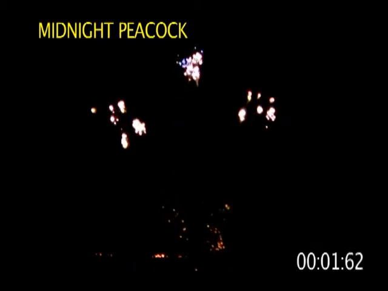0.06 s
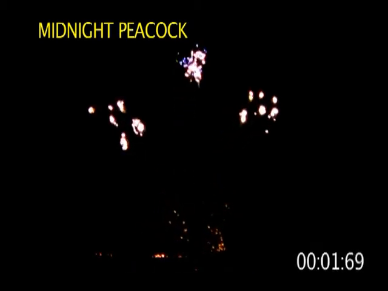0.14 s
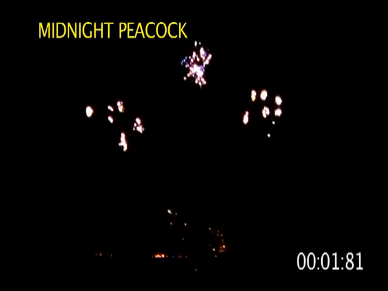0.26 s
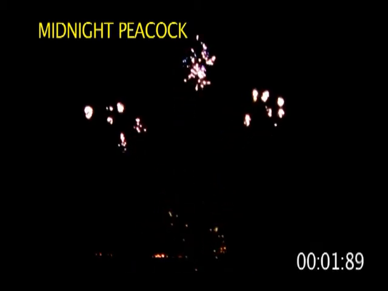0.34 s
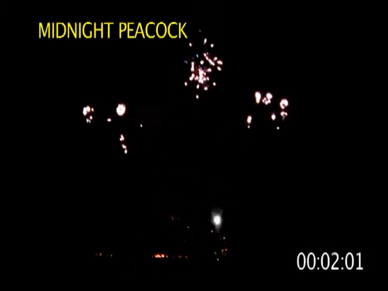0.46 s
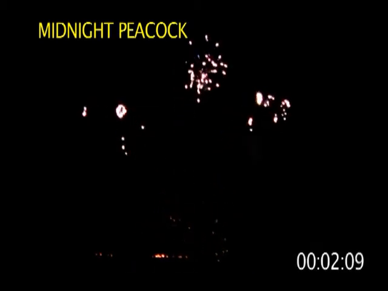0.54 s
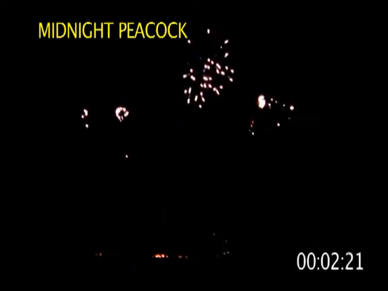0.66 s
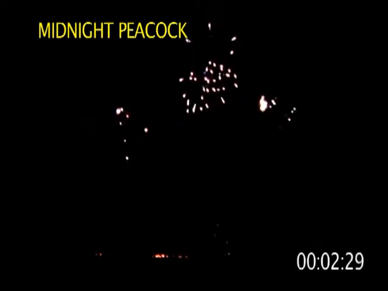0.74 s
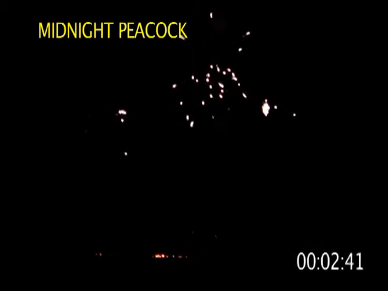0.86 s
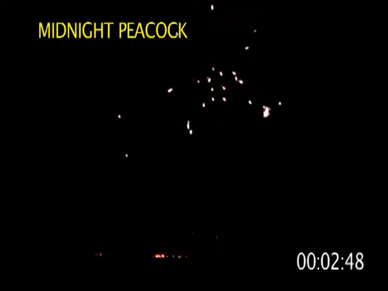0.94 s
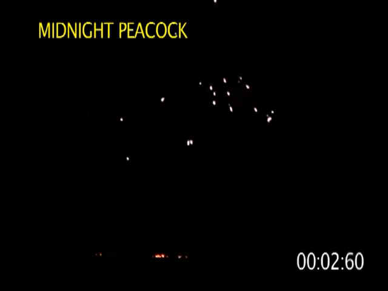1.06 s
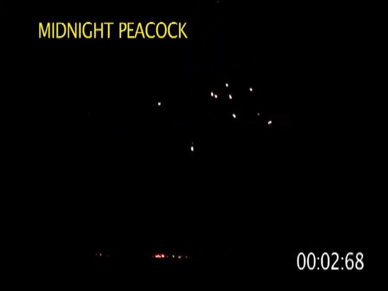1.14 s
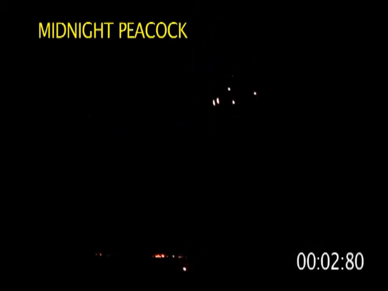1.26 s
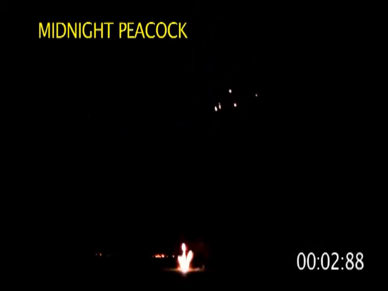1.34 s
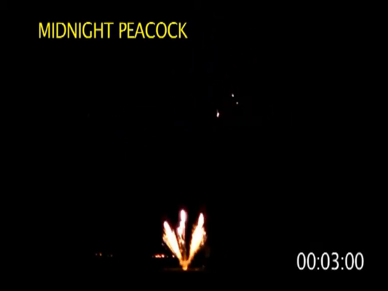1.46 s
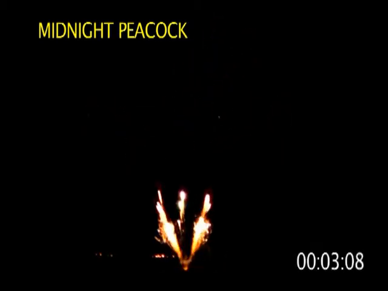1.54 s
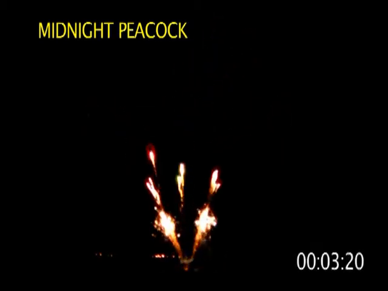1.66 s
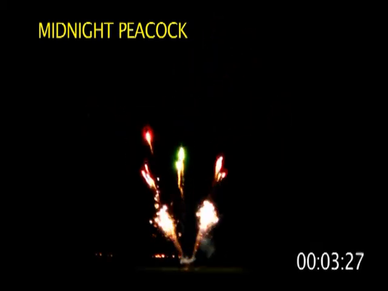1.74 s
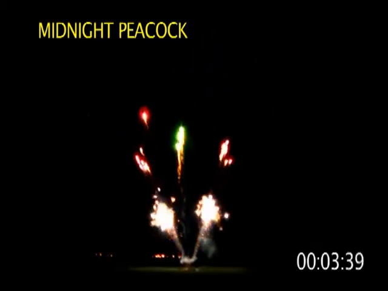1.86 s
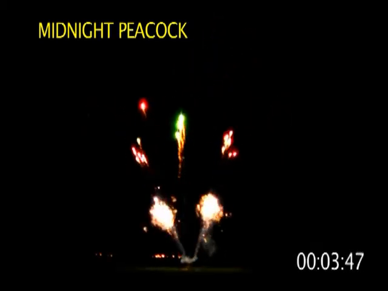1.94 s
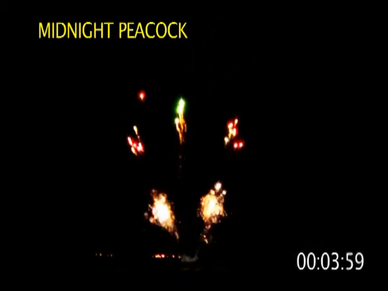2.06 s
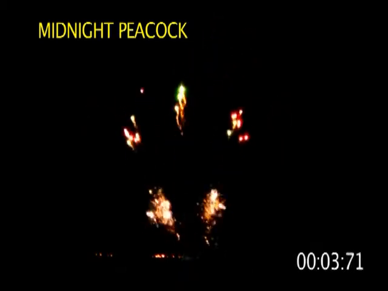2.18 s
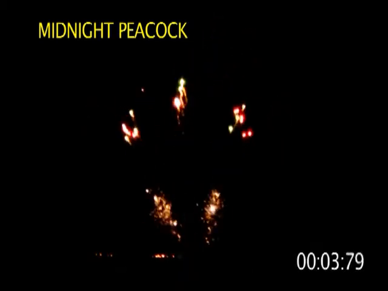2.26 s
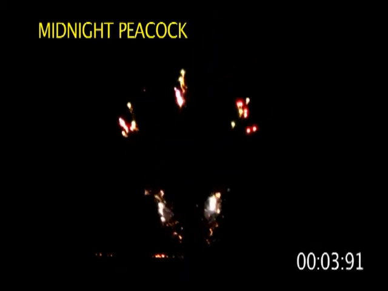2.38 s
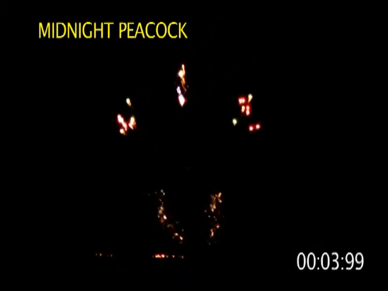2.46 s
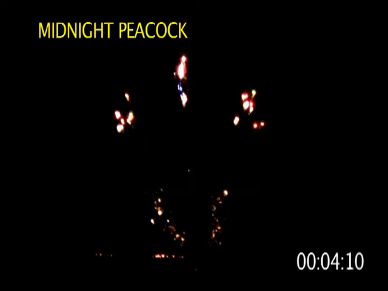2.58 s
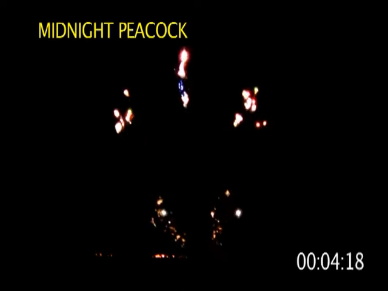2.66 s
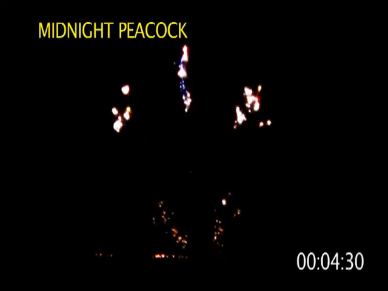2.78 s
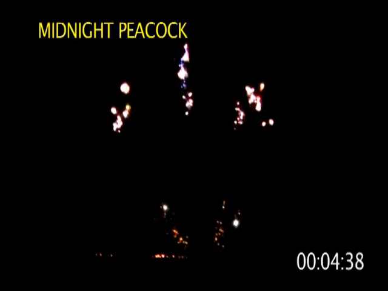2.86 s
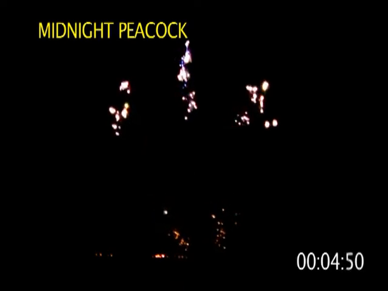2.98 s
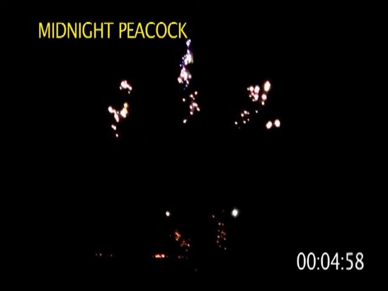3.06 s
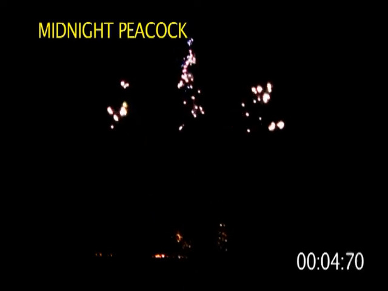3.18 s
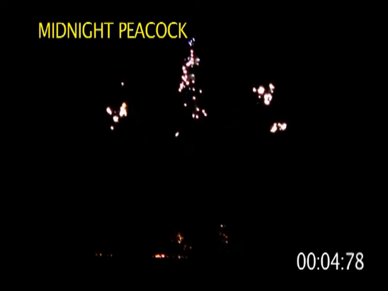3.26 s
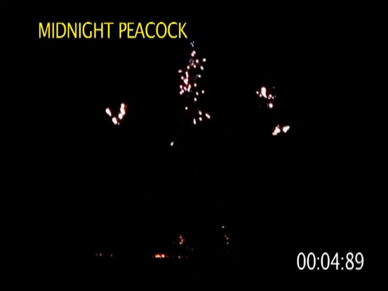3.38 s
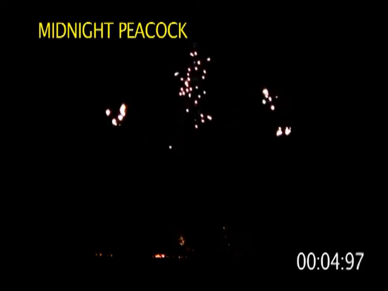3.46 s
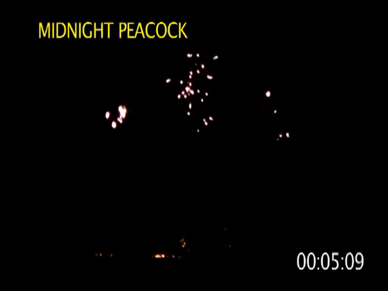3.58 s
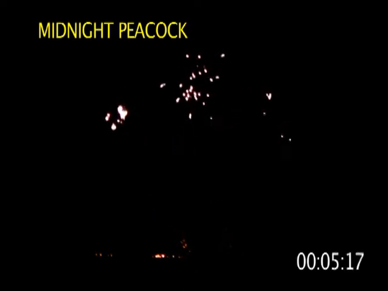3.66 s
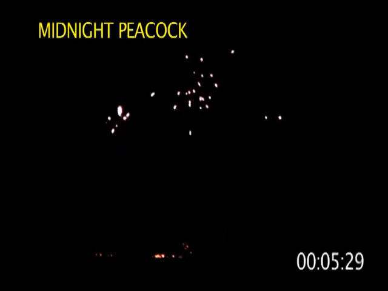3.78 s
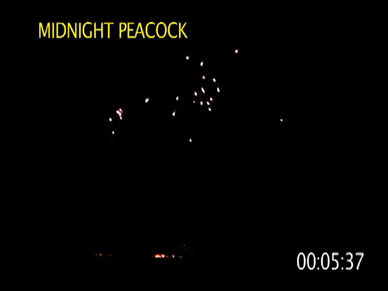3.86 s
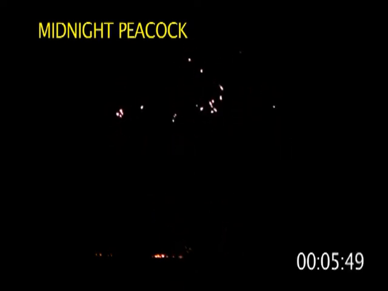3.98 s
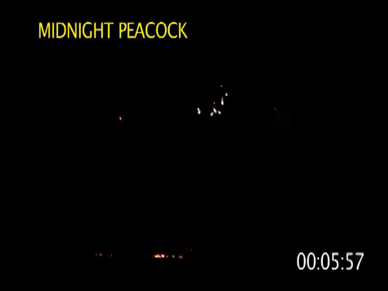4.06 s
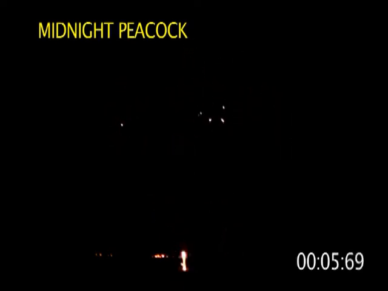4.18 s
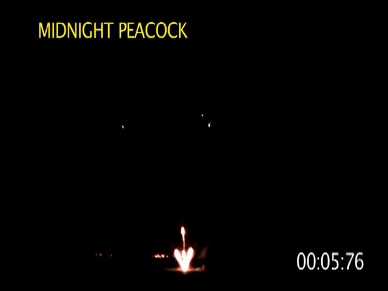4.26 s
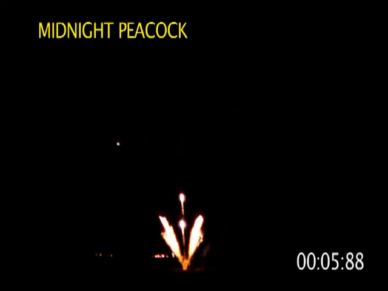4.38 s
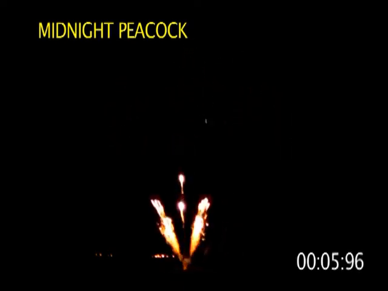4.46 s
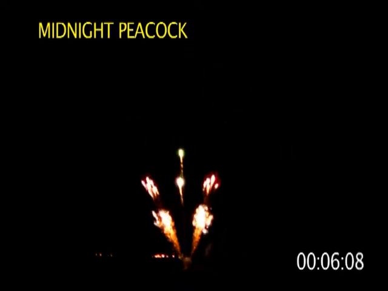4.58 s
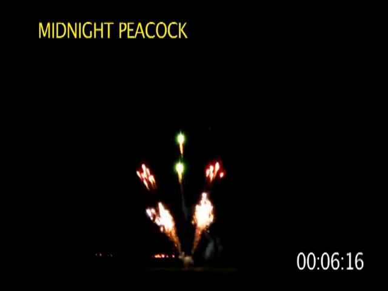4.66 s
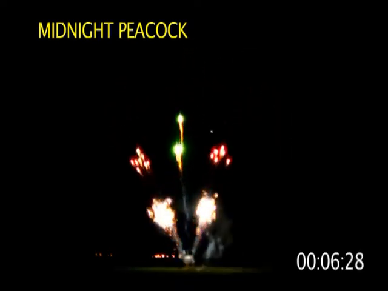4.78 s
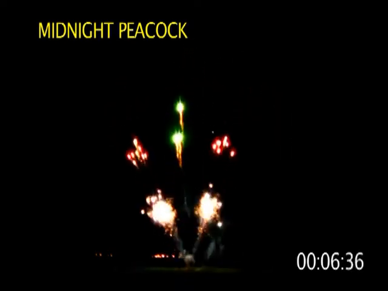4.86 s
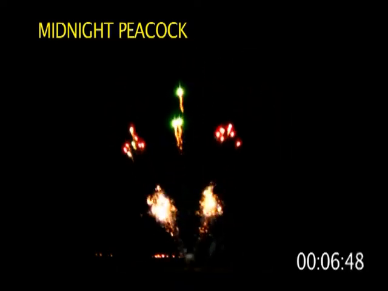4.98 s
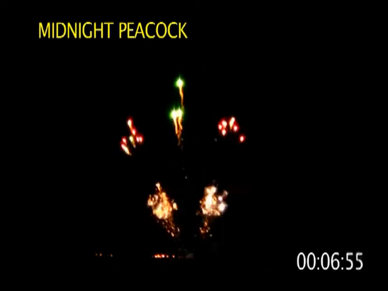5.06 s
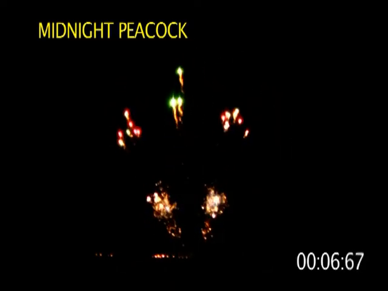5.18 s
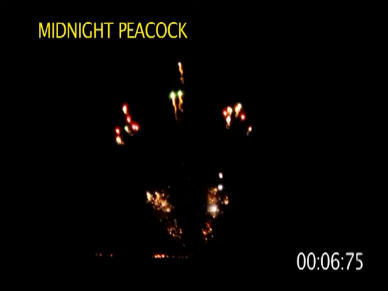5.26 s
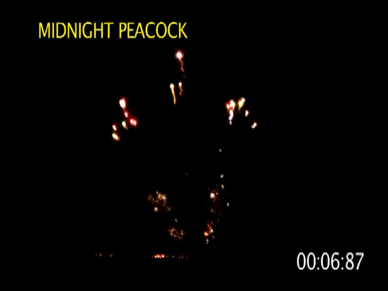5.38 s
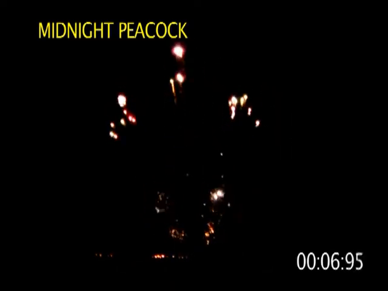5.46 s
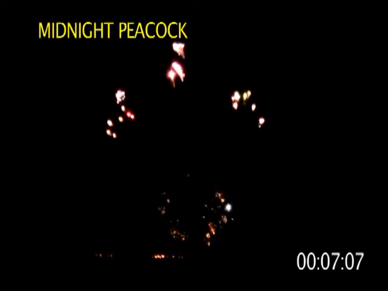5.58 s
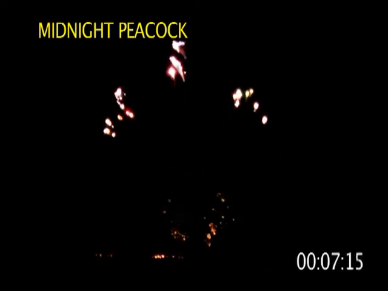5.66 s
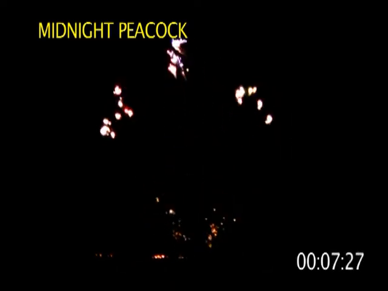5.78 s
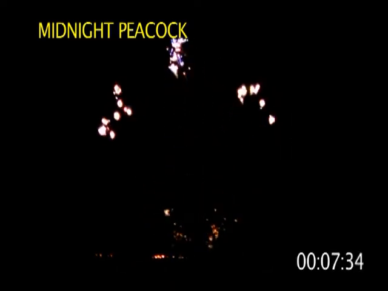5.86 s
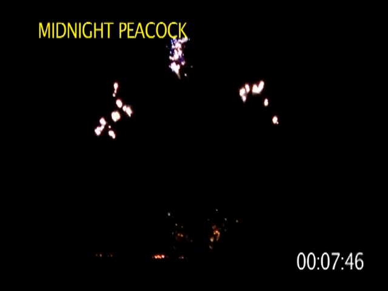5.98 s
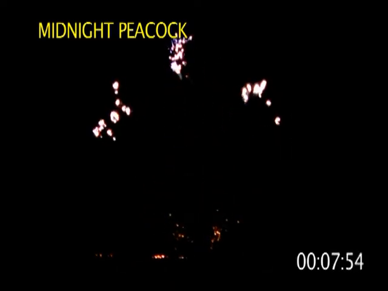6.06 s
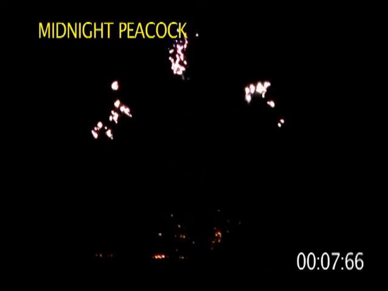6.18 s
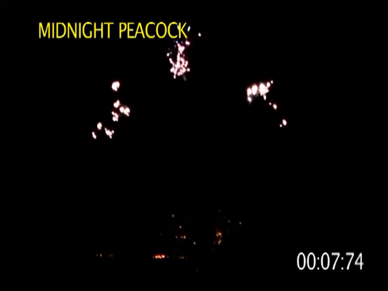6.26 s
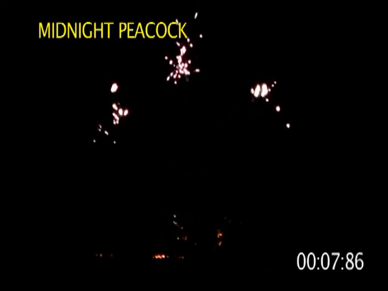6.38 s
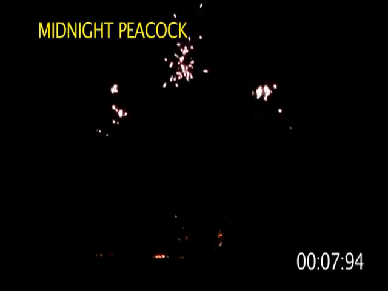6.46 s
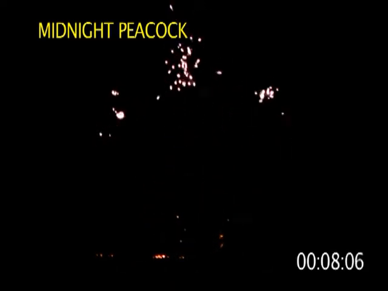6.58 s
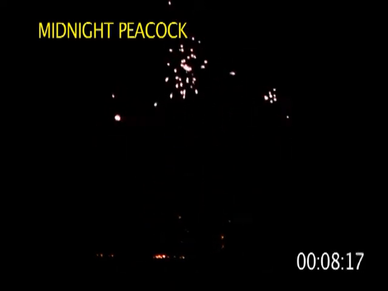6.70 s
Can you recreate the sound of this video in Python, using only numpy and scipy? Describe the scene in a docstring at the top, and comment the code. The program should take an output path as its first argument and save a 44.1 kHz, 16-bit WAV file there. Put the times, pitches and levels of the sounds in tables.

```python
"""A firework cake fires two volleys on an open field at night, heard from some distance.
Lift charges expel slugs of gas that thump in quick ripples. A fountain of bursting grains, each a
small shock, swells and thins to single snaps, while burning stars fizz overhead. Trees and ground
return a thin echo. Low rumbles come from gusts, the thumps' aftermath and the fountain's whoosh;
a light breeze and a faint far-off rush and drone lie under it all."""
import sys
import numpy as np
from scipy import signal
from scipy.fft import rfft, irfft
from scipy.io import wavfile
from scipy.ndimage import uniform_filter1d

SR = 44100
rng = np.random.default_rng(int(sys.argv[2]) if len(sys.argv) > 2 else 0)


def to_wav(s):
    """Save 16-bit WAV."""
    ch = np.atleast_2d(s).T  # columns
    pcm = np.round(np.clip(ch, -1, 1) * 32767)  # PCM
    wavfile.write(sys.argv[1], SR, pcm.astype(np.int16))


N = 296793
TIME = np.arange(N) / SR

# lift charges: (time [s], thump peak [dB], thump frequency [Hz], crack level [dB])
LIFT_CHARGES = [(1.5426, -8, 178, -31.5), (1.5777, -8.5, 146, -35), (1.5822, -4.5, 160, -23.5),
                (1.588, -5, 140, -23.5), (1.5973, -6.5, 142, -31), (4.415, -7, 196, -23.5),
                (4.467, -22, 180, -45), (4.475, -16, 180, -26), (4.4800, -6, 192, -15.5),
                (4.484, -19, 193, -25), (4.4893, -2.5, 181, -32), (4.509, -19, 189, -52)]
# fountains of grains, one a volley: # (crest time [s], level [dB], swell [dB/s], fade [dB/s], ring gain [dB],
# near reflection gain [dB])
GRAIN_FOUNTAINS = [(2.19, -18.5, 56, 89, -26.5, -22.5), (5.07, -19.5, 66, 80.5, 2.5, -16)]
# loud single snaps: (time [s], energy as a level over one millisecond [dB], spectral tilt [dB/octave])
SINGLE_SNAPS = [(0.2172, -24, 0.5), (0.4731, -28.5, -1), (0.5824, -17, 0), (0.7487, -41, 4.5),
                (1.762, -12.5, -6.5), (1.8172, -17.5, 1), (1.8511, -15.5, 0), (1.9059, -13, 3.5),
                (2.006, -10, 5.5), (2.0108, -12, 6.5), (2.1186, -6.5, 1), (2.1497, -8, 3),
                (2.1856, -7.5, 3), (2.2534, -6.5, -0.5), (2.2765, -6.5, -3), (2.3128, -9, 0),
                (2.3371, -11, -0.5), (2.37, -12.5, -0.5), (2.3857, -10.5, 4), (2.4083, -9, 0),
                (2.4375, -16, 2.5), (2.448, -14, -0.5), (2.4607, -13.5, 3), (2.47, -11, -1),
                (2.5519, -22.5, 3), (2.582, -21, -0.5), (2.6405, -18, -1), (2.6692, -18, -1),
                (2.676, -20.5, -3), (2.7697, -30, -0.5), (2.949, -20, 1), (3.0502, -26, 2),
                (3.1977, -32, -3.5), (3.2487, -22, -1.5), (3.3302, -34.5, -2), (3.3491, -19, -1.5),
                (4.7498, -19, -4.5), (4.955, -9.5, 1.5), (5.0054, -9.5, -0.5), (5.0912, -31, 2),
                (5.15, -8.5, -2.5), (5.1773, -11.5, -3), (5.2468, -16, -3), (5.3105, -22, -4),
                (5.3366, -16.5, -1.5), (5.3534, -13, -1), (5.3754, -13.5, 0.5), (5.3958, -18, -2.5),
                (5.4339, -18.5, -2), (5.445, -20, -2.5), (5.4863, -13.5, -0.5), (5.5078, -21, -2.5),
                (5.5274, -22, -2), (5.709, -17.5, -3), (5.7558, -27.5, -1.5), (5.775, -29, -2),
                (5.7903, -21, -0.5), (5.7966, -13.5, -0.5), (5.8045, -20, -2), (5.849, -17, -1.5),
                (5.906, -29, 2), (5.9768, -27.5, 0), (6.0326, -19, -2), (6.101, -28, 0.5),
                (6.393, -21.5, 1), (6.5577, -35, -7)]
# burning stars: (start of fade [s], level [dB], fade [dB/s])
STAR_BURNS = [(.16, -46.5, 16), (2.95, -49, 12.5), (5.66, -47, 11)]
# low buffeting of the air from wind gusts, the rumble after the thumps and the fountain's whoosh:
# (time [s], duration [s], level [dB])
LOW_RUMBLES = [(0.555, 0.24, -31), (1.116, 0.099, -32.5), (1.714, 0.18, -32.5), (2.13, 0.073, -48),
               (2.417, 0.054, -35), (2.718, .12, -40), (3.036, 0.17, -36), (3.308, 0.013, -37),
               (3.447, .02, -39), (4.6, 0.14, -37), (5.062, 0.098, -32), (5.465, 0.24, -34.5),
               (6.283, 0.13, -42.5), (6.617, .05, -47)]
# breeze between the rumbles: (time [s], level [dB])
BREEZE_LEVELS = [(0, -55), (.4, -46), (3.4, -47.5), (3.65, -71.5), (4.3, -57.5), (4.7, -40), (5.9, -49),
                 (6.73, -58)]
# distant hollow rush: (time [s], level [dB])
RUSH_LEVELS = [(0, -61.5), (1.25, -60.5), (1.55, -53), (3.6, -61.5), (4.4, -65.5), (6.73, -61)]

# spectra of the sources and of the thumps' echo: (frequency [Hz], relative level [dB])
CRACK_SPECTRUM = [(100, 1.5), (380, -6), (600, -7.5), (1000, -10.5), (1700, -6), (2250, 4.5), (3000, -2.5),
                  (4400, -15.5), (5100, -15.5), (7400, -33), (9000, -27.5), (12500, -33)]
GRAIN_SPECTRUM = [(100, -12.5), (330, -18.5), (550, -11), (1000, -8.5), (1700, -5.5), (2300, 1.5),
                  (3200, -2.5), (3950, -6.5), (4400, -16), (4950, -10), (6100, -23), (7500, -34),
                  (8400, -24), (12500, -31.5)]
SNAP_SPECTRUM = [(100, -19), (330, -23.5), (550, -12.5), (1000, -11), (1700, -7), (2300, 0.5), (3200, -2.5),
                 (3950, -5), (4400, -15), (4950, -9.5), (6100, -24.5), (7400, -32.5), (8600, -28.5),
                 (12500, -35.5)]
STAR_SPECTRUM = [(200, -15), (600, -6.5), (1200, -4), (1600, -2), (2300, 1.5), (3200, -1.5), (3950, -5.5),
                 (4400, -16), (4950, -10), (6100, -23), (7400, -31), (9000, -28.5), (11500, -30.5),
                 (13000, -42)]
THUMP_ECHO_SPECTRUM = [(30, -9.5), (70, -1.5), (140, -0.5), (220, 1.5), (320, 0), (600, -23), (2000, -46.5)]
RUMBLE_SPECTRUM = [(15, -0.5), (35, -0.5), (60, 2), (110, 0), (200, -9), (300, -18), (500, -28.5),
                   (1000, -52), (3000, -77)]
RUSH_SPECTRUM = [(400, -35.5), (800, -7), (1080, -9), (1350, -9), (1900, -22.5), (4000, -43.5)]
MURMUR_SPECTRUM = [(25, -2), (90, -1), (180, -9), (400, -14), (750, -20), (1100, -28.5), (1700, -33),
                   (3000, -45.5), (4400, -36.5), (7000, -40), (11300, -40), (12500, -62.5)]
# scattered sound at two close microphones: (frequency [Hz], side level relative to mid [dB])
SIDE_SPECTRUM = [(60, -14.5), (200, -9), (500, -2.5), (1000, -3), (2200, -10.5), (3400, -13), (4600, -1),
                 (7000, 8), (12000, -3)]


def lift_charges(swell_s=0.0031, q=1.17, bass_cut_hz=80, crack_t60=0.064, crack_lag_s=0.00087,
                 jet_db=-4.0, jet_t60=0.093):
    """Sudden outflow: a tube's slug of gas drives a damped pressure swing, a crack and a short jet."""
    t = np.arange(4096) / SR
    slug = (t / swell_s) ** 2 * np.exp(-2 * t / swell_s)
    slug = signal.lfilter(*signal.butter(1, bass_cut_hz, "high", fs=SR), slug)
    crack_decay = from_db(-60 * t / crack_t60) + from_db(jet_db - 60 * t / jet_t60)
    thumps, crack_power = np.zeros(N), np.zeros(N)
    for s, thump_db, hz, crack_db in LIFT_CHARGES:
        omega = 2 * np.pi * hz
        resonant_highpass = signal.bilinear([1, 0, 0], [1, omega / q, omega ** 2], SR)
        thump = signal.lfilter(*resonant_highpass, slug)
        add(thumps, s, from_db(thump_db) * thump / np.abs(thump).max())
        add(crack_power, s + crack_lag_s, (from_db(crack_db) * crack_decay) ** 2)
    return thumps, np.sqrt(crack_power) * noise(CRACK_SPECTRUM)


def fountain(crest_s, db, swell, fade, ring_db, bounce_db, burn_s=1.1, first_per_s=4000,
             thinning_s=0.6, spread_db=5.5, hiss_db=-16.5, kinds=16):
    """Shot noise: grains burst at random at a falling rate, so a dense sizzle turns to coarser cracks."""
    age = np.arange(int(burn_s * SR)) / SR
    bursts_per_s = first_per_s * np.exp(-age / thinning_s)
    chance, size, kind = rng.random((N, 3))[:len(age)].T
    size_db = spread_db * np.minimum(-np.log1p(-size), 3)   # capped exponential distribution
    bursts = (chance < bursts_per_s / SR) * from_db(size_db)
    shapes = shocks(np.linspace(-2, 2, kinds), GRAIN_SPECTRUM, scatter_db=-19.0)
    crackle = sum(convolve(bursts * (np.floor(kind * kinds) == k), shapes[k]) for k in range(kinds))
    # the cloud burns smoothly however the single grains fall; the finest merge into a hiss
    power = uniform_filter1d(np.mean(crackle ** 2, axis=0), size=2048)
    hiss = from_db(hiss_db) * noise(GRAIN_SPECTRUM)[:, :len(age)]
    crackle = crackle / np.sqrt(np.abs(power) + 1e-9) + hiss
    crackle += from_db(ring_db) * resonance(crackle, hz=1278, q=24)   # hollow, as of the emptied tubes
    out = np.zeros((2, N))
    add(out, crest_s - burn_s / 2, crackle)
    return from_db(db + fountain_db(TIME - crest_s, swell, fade)) * near_reflection(out, bounce_db)


def fountain_db(from_crest_s, swell_db_per_s, fade_db_per_s, rounding_s=0.12):
    """Exponential growth and decay: a fountain's level is two slopes joined by a round crest at 0 dB."""
    slope = np.where(from_crest_s < 0, swell_db_per_s, fade_db_per_s)
    return -slope * (np.hypot(from_crest_s, rounding_s) - rounding_s)


def coarse_grains(per_s=58, lead_s=0.42, crest_db=-13.5, spread_db=1, swell_share=0.65, count=40):
    """Irregular impulse train: bigger grains crack around each crest, duller as the fountain burns down."""
    out = np.zeros((2, N))
    for crest_s, _, swell, fade, _, _ in GRAIN_FOUNTAINS:
        from_crest_s = (np.arange(count) + rng.random(count)) / per_s - lead_s
        size, brightness = np.clip(rng.standard_normal((count, 2)), -2, 2).T
        levels_db = crest_db + spread_db * size + swell_share * fountain_db(from_crest_s, swell, fade)
        tilts = 3.0 * brightness - 5.5 * from_crest_s   # dB per octave
        shapes = shocks(tilts, SNAP_SPECTRUM, scatter_db=-18.5)
        for s, db, shape in zip(from_crest_s, levels_db, shapes):
            add(out, crest_s + s, from_db(db) * shape)
    return out


def snaps():
    """Impulsive sources: the biggest grains burst one by one, each radiating a single shock."""
    out = np.zeros((2, N))
    times, levels_db, tilts = np.transpose(SINGLE_SNAPS)
    for s, db, shape in zip(times, levels_db, shocks(tilts, SNAP_SPECTRUM, scatter_db=-20.5)):
        add(out, s, from_db(db) * shape)
    return out


def shocks(tilts, spectrum, scatter_db, scatter_t60=0.032, ground_db=-3.5, size=1024):
    """Multipath: shocks of equal energy arrive directly, off the ground and scattered by the grass."""
    t, count = np.arange(size) / SR, len(tilts)
    paths = diffuse(count * size).reshape(2, count, size) * from_db(scatter_db - 60 * t / scatter_t60)
    paths[:, :, 0] += 1   # direct path
    bounce_lags = (rng.uniform(0.0006, 0.001896, count) * SR).astype(int)
    paths[:, np.arange(count), bounce_lags] += from_db(ground_db)
    hz, db = np.transpose(spectrum)
    octaves = np.log2(np.clip(hz, 400, 6000))
    pulses = np.array([impulse_response(np.c_[hz, db + tilt * octaves], size) for tilt in tilts])
    shapes = signal.fftconvolve(paths, pulses[None], axes=2)[:, :, :size]
    millisecond = SR / 1000
    energy = np.sum(shapes.mean(0) ** 2, axis=1) / millisecond
    return (shapes / np.sqrt(energy)[:, None]).transpose(1, 0, 2)


def stars(hold_s=0.75):
    """Combustion noise: the stars catch, fizz evenly for a moment, then fade exponentially."""
    gains = [(TIME > s - hold_s) * from_db(db - fade * np.maximum(TIME - s, 0))
             for s, db, fade in STAR_BURNS]
    return np.max(gains, axis=0) * noise(STAR_SPECTRUM)


def near_reflection(sound, bounce_db, lag_s=0.00114):
    """Interference: a near reflection off the microphone stand arrives late and inverted, and ripples the
    spectrum."""
    delayed = np.array([np.interp(TIME - lag_s, TIME, channel, left=0) for channel in sound])
    return sound - from_db(bounce_db) * delayed


def field_echo(sound, wet_db, t60, spectrum=None, rise_s=0.0031):
    """Reverberation: trees and ground scatter back a thin, exponentially decaying tail."""
    t = np.arange(2 * SR) / SR
    decay = from_db(-60 * t / t60)
    tail = diffuse(len(t)) * decay * (1 - np.exp(-t / rise_s))
    if spectrum:
        tail = convolve(tail, impulse_response(spectrum))
    return convolve(sound, tail * from_db(wet_db) / np.sqrt(np.sum(decay ** 2)))


def rumbles_and_breeze(own_db=6.0, lean_db=2.0):
    """Partial coherence: low buffeting of the air, partly each side's own and stronger on the right."""
    shared, left, right = convolve(rng.standard_normal((3, N)), impulse_response(RUMBLE_SPECTRUM))
    pressure = shared + from_db(own_db) * np.array([left, right])
    pressure = unit_rms(pressure * from_db([[-lean_db], [lean_db]]))
    rumbles = from_db(np.max([rumble_db(*row) for row in LOW_RUMBLES], axis=0))
    return np.hypot(envelope(BREEZE_LEVELS), rumbles) * pressure


def rumble_db(s, length_s, db, rise_db_per_s=231.5, sag_db_per_s=17.5, release_db_per_s=173):
    """Exponential envelope: a rumble rises quickly, sags while it lasts and dies away."""
    age = TIME - s
    rise = rise_db_per_s * np.minimum(age, 0)
    sag = sag_db_per_s * np.clip(age, 0, length_s)
    release = release_db_per_s * np.maximum(age - length_s, 0)
    return db + rise - sag - release


def distant_rush(hollow_db=-7.5):
    """Resonant colouring: one spectral peak lends a faint far-off rush a slight hollow pitch."""
    air = noise(RUSH_SPECTRUM)
    hollow = from_db(hollow_db) * resonance(air, hz=1060, q=10)
    return envelope(RUSH_LEVELS) * unit_rms(air + hollow)


def night_background(murmur_db=-57, drone_db=-57):
    """Narrow-band noise wavers in amplitude: a low drone within the broad far-off murmur of the night."""
    drone = unit_rms(resonance(rng.standard_normal(N), hz=89, q=14))
    return from_db(murmur_db) * noise(MURMUR_SPECTRUM) + from_db(drone_db) * drone


def diffuse(size):
    """Diffuse field: noise arriving from all round is only partly coherent at the two microphones."""
    mid, side = rng.standard_normal((2, size))
    return unit_rms(mid + convolve(side, impulse_response(SIDE_SPECTRUM)) * [[1], [-1]])


def noise(spectrum):
    """Spectral shaping: diffuse noise takes on a given spectrum, at unit power."""
    return unit_rms(convolve(diffuse(N), impulse_response(spectrum)))


def resonance(sound, hz, q):
    """A second-order resonator passes a band of width hz / q."""
    return signal.lfilter(*signal.iirpeak(hz, q, fs=SR), sound)


def impulse_response(spectrum, size=4096):
    """Minimum phase: folding the cepstrum gives a causal response with the given spectrum."""
    hz, db = np.transpose(spectrum)
    grid_hz = np.maximum(np.arange(size // 2 + 1) * SR / size, 1)
    magnitude = from_db(np.interp(np.log(grid_hz), np.log(hz), db))
    cepstrum = irfft(np.log(magnitude))
    cepstrum[1:size // 2] *= 2
    cepstrum[size // 2 + 1:] = 0
    return irfft(np.exp(rfft(cepstrum)))


def convolve(sound, response):
    """Linear filtering by an impulse response, cut to the sound's length."""
    return signal.fftconvolve(np.atleast_2d(sound), np.atleast_2d(response), axes=1)[:, :sound.shape[-1]]


def envelope(rows):
    """Gain interpolated through rows of (time [s], level [dB])."""
    return from_db(np.interp(TIME, *np.transpose(rows)))


def add(out, s, sound):
    """Superpose a sound starting at s seconds."""
    at = int(round(s * SR))
    out[..., at:at + sound.shape[-1]] += sound[..., :N - at]


def from_db(db):
    """Decibels to amplitude ratio."""
    return 10 ** (np.asarray(db) / 20)


def unit_rms(x):
    """Normalise to unit power."""
    return x / np.sqrt(np.mean(x ** 2) + 1e-20)


def scene():
    """Superposition: thumps and crackle add to their echoes, the fizz, the rumbles and the background."""
    thumps, cracks = lift_charges()
    crackle = cracks + snaps() + coarse_grains() + sum(fountain(*row) for row in GRAIN_FOUNTAINS)
    echoes = field_echo(crackle, wet_db=-36.0, t60=0.24)
    echoes += field_echo(thumps, wet_db=-14.0, t60=0.73, spectrum=THUMP_ECHO_SPECTRUM)
    firework = thumps + crackle + echoes + stars()
    return firework + distant_rush() + rumbles_and_breeze() + night_background()


def record(dry, cutoff_hz=13300):
    """Soft saturation rounds the highest peaks just under full scale; a low-pass cuts the top treble."""
    rounded = dry / (1 + dry ** 8) ** (1 / 8)
    return signal.sosfilt(signal.ellip(10, 0.2, 80, cutoff_hz, fs=SR, output="sos"), rounded)


dry = scene()
out = record(dry)
to_wav(out)
```